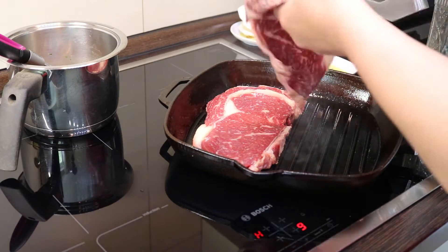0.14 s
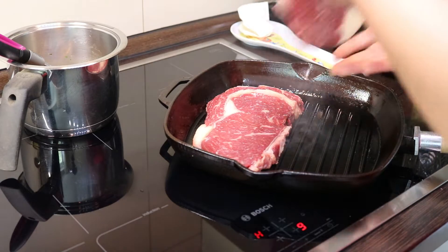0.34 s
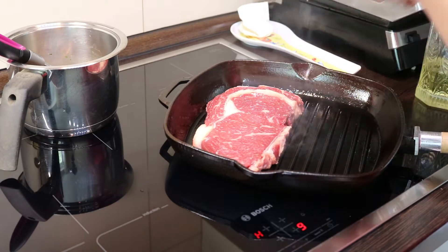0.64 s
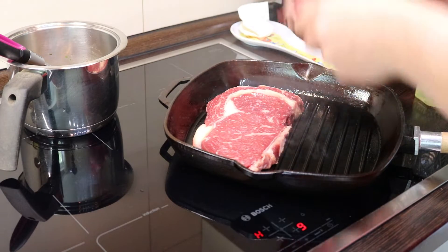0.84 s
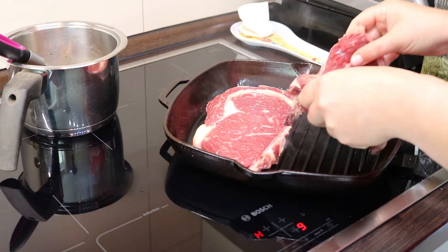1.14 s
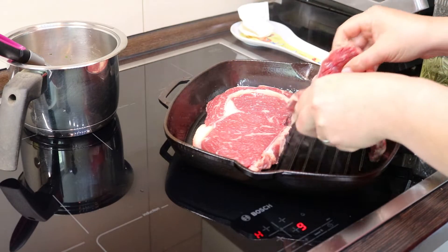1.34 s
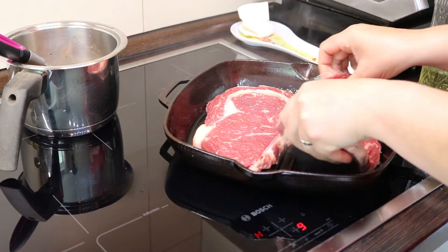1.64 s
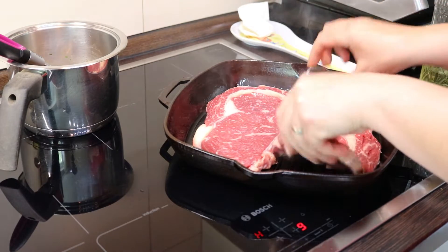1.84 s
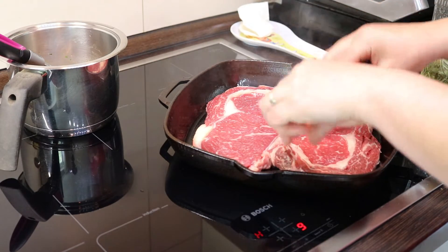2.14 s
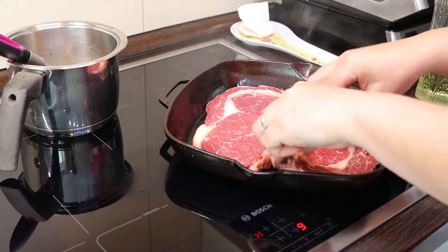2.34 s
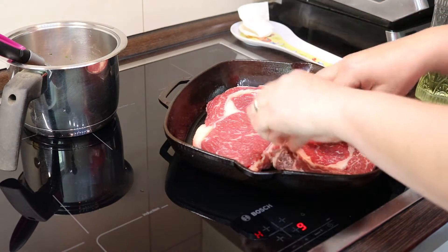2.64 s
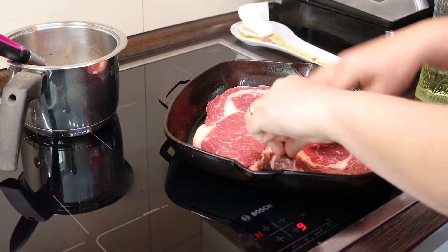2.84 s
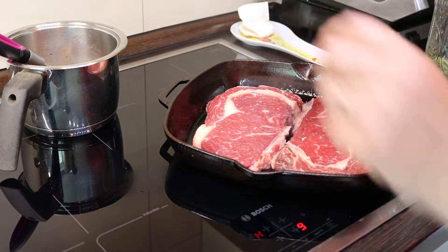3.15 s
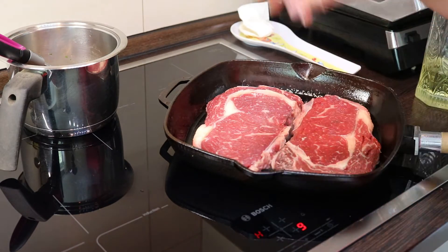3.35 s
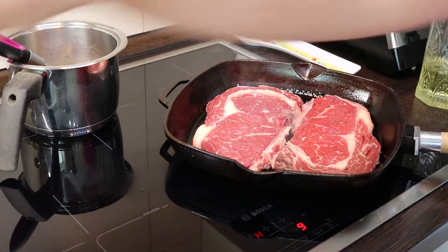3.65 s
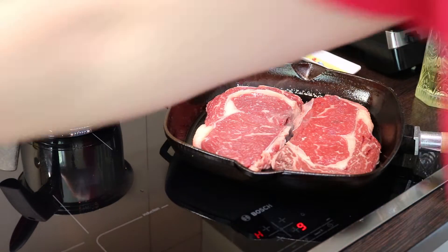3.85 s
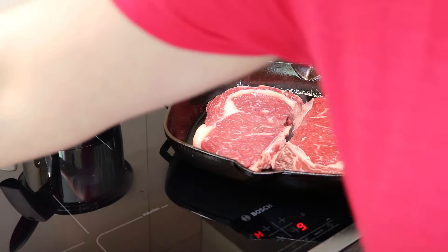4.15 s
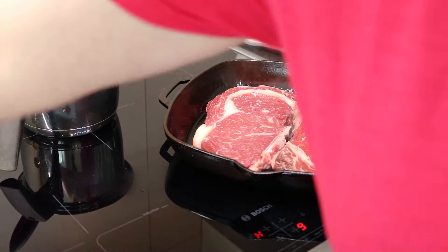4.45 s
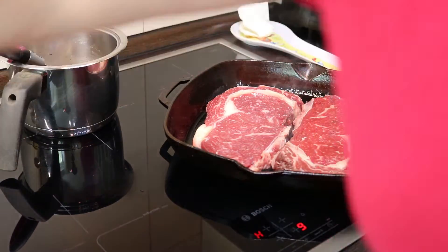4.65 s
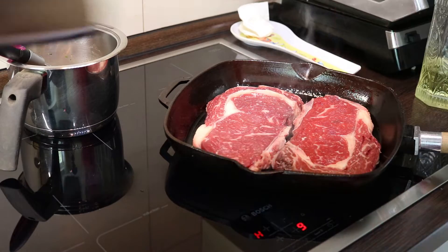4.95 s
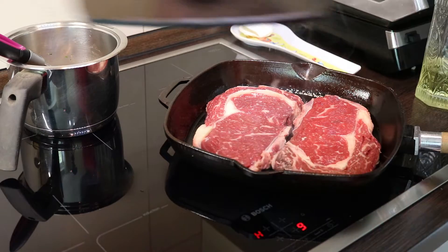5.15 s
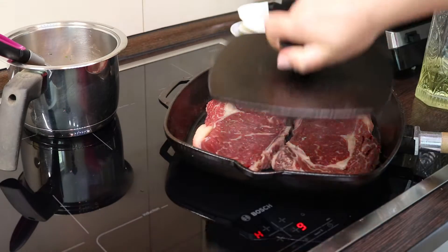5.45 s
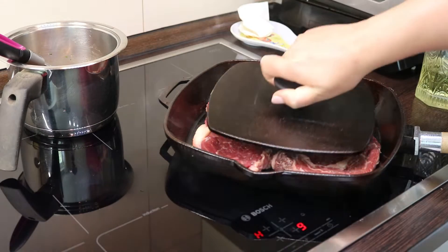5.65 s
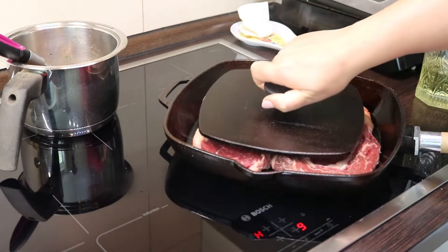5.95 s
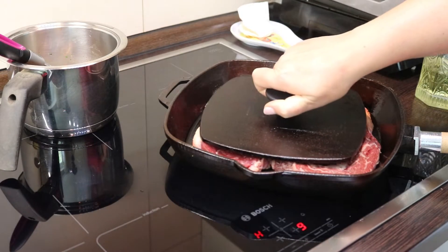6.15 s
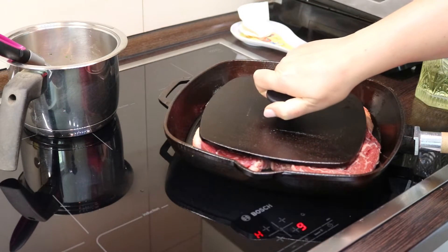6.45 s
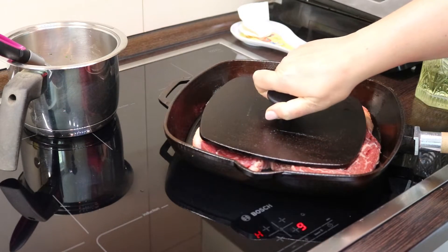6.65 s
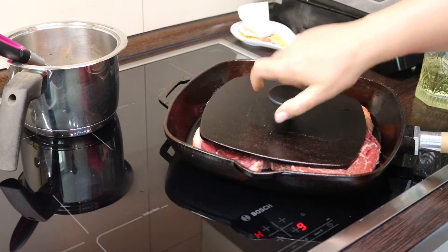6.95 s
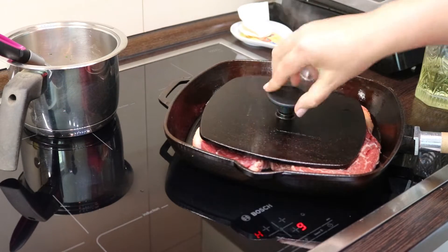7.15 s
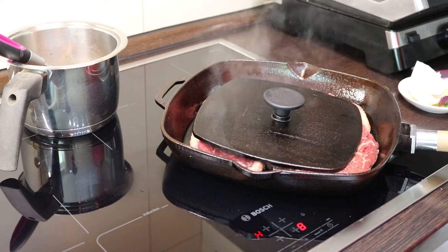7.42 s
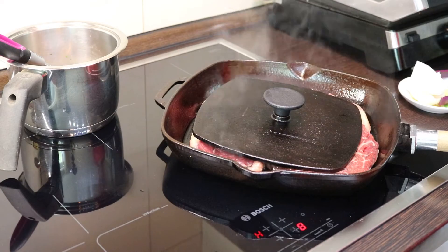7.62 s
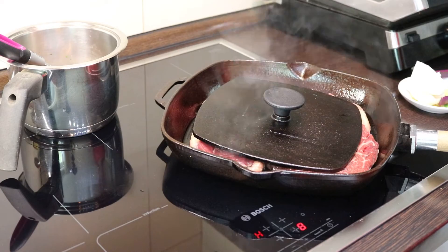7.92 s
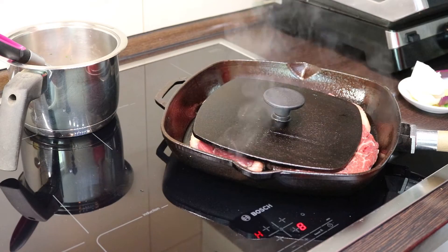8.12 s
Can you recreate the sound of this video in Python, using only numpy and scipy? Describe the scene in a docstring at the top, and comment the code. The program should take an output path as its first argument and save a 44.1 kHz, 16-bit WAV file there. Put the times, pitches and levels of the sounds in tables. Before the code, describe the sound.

Meat fries in a hot iron pan with a continuous crackling hiss, heard from close up in a home kitchen over a faint stove hum. Water drops burst in the fat, loudest in the first moments and once around the middle, and trapped juice spurts and fizzes. Late on, the sizzle turns slightly rougher and more bubbly, then stops dead. A short, quiet rumble and a very faint rising hiss follow.

```python
"""Steaks sizzle in a cast-iron grill pan on an induction hob in a small kitchen. Steam bubbles of three
sizes burst in the fat, flare up when juice meets the iron and grow coarser under a press.
Water drops pop, trapped juice spurts, steam jets fizz; behind them are soft bumps and the hob's hum.
The sound cuts off abruptly; a brief dull rumble follows in near silence, then a faint rising hiss."""
import sys
import numpy as np
from scipy import signal
from scipy.fft import rfft, irfft, next_fast_len
from scipy.io import wavfile
from scipy.ndimage import uniform_filter1d, map_coordinates

SR = 44100
rng = np.random.default_rng(int(sys.argv[2]) if len(sys.argv) > 2 else 0)


def transcribe(u):
    """Save the signal u as a 16-bit wav file named by the first command-line argument.

    u: samples, shape (n,) or (channels, n), limited to [-1, 1]; the rate is SR.
    q: integer samples, one column per channel.
    """
    v = np.clip(np.atleast_2d(u).T, -1, 1)
    q = np.round(v * 32767).astype(np.int16)
    wavfile.write(sys.argv[1], SR, q)


N = 365148
TIME = np.arange(N) / SR
TOP_HZ = 16000
CRACK_LEAD_S = .001  # build-up before a crack's peak


def amp(db):
    """Decibels to gain."""
    return 10 ** (np.asarray(db) / 20)


def unit(x):
    """Scale to rms 1."""
    return x / np.sqrt(np.mean(x ** 2) + 1e-20)


def along(points, hz):
    """Interpolate (freq_hz, value) points on a log axis."""
    freqs_hz, values = np.transpose(points)
    return np.interp(np.log(hz + 1), np.log(freqs_hz + 1), values)


def curve(points):
    """Interpolate (time_s, value) points per sample."""
    return np.interp(TIME, *np.transpose(points))


def envelope(start_s, length_s, attack_s, release_s):
    """Linear rise, hold until length_s is over, exponential fall."""
    t = TIME - start_s
    return np.clip(t / attack_s, 0, 1) * np.exp(-np.maximum(t - length_s, 0) / release_s)


def wobble(rate_hz):
    """Smooth random curve, rate_hz knots a second."""
    return map_coordinates(rng.standard_normal(int(rate_hz * N / SR) + 4), [rate_hz * TIME])


def filtered(x, gain):
    """Apply gain(freq_hz) to x."""
    size = x.shape[-1]
    padded = next_fast_len(size + 8192)
    return irfft(rfft(x, padded) * gain(np.fft.rfftfreq(padded, 1 / SR)), padded)[..., :size]


def resonance(f, hz, q):
    """Causal two-pole band-pass response."""
    return 1j * f * hz / q / (hz * hz - f * f + 1j * f * hz / q)


def add(track, start_s, sound):
    """Mix a sound into a track."""
    part = track[..., max(round(start_s * SR), 0):][..., :sound.shape[-1]]
    part += sound[..., :part.shape[-1]]


def stereo_noise(spectrum, side_db):
    """Coloured noise, rms 1."""
    mid, side = filtered(rng.standard_normal((2, N)), lambda f: amp(along(spectrum, f)))
    return unit(np.array([mid + amp(side_db) * side, mid - amp(side_db) * side]))


# freq_hz, relative_db
RUMBLE_SPECTRUM = [(20, -10), (45, -5.5), (90, -8.5), (160, -25), (400, -30), (1000, -29), (2700, -36),
                   (3500, -43.5), (15000, -51.5)]
def room_noise(level_db=-68.5):
    """Steady low noise of the kitchen."""
    return amp(level_db) * stereo_noise(RUMBLE_SPECTRUM, side_db=3.5)


def rumble(level_db=-49.5, floor_db=-111, sputter_db=2.5):
    """One brief, dull, sputtering rumble over a near-silent floor."""
    swell = envelope(start_s=7.48, length_s=.21, attack_s=.0051, release_s=.0039)
    sputter = unit(amp(sputter_db * wobble(rate_hz=45)))
    return (amp(floor_db) + amp(level_db) * swell * sputter) * stereo_noise(RUMBLE_SPECTRUM, side_db=-3)


# freq_hz, relative_db
HISS_SPECTRUM = [(30, -16.5), (330, -4.5), (1000, -6.5), (2500, -15), (6000, -6), (9000, -27), (16000, -34)]
def hiss(floor_db=-101, end_db=-62, rise_db_per_s=550):
    """Faint hiss that swells at the very end."""
    swell = amp(end_db - rise_db_per_s * (TIME[-1] - TIME))
    return (amp(floor_db) + swell) * stereo_noise(HISS_SPECTRUM, side_db=-9)


# time_s, level_db
COIL_LEVELS = [(0, -56), (1.4, -57), (2.2, -56.5), (2.7, -60.5), (3.8, -63.5), (4.4, -57.5), (5.4, -60.5),
               (6.6, -58), (6.68, -69), (7.3, -64)]
def hob_hum(pitch_hz=100, waver_db=2.5):
    """The induction coil hums at twice the mains frequency, wavering a little."""
    level_db = curve(COIL_LEVELS) + waver_db * wobble(rate_hz=12)
    phase = 2 * np.pi * pitch_hz * TIME
    tone = np.sin(phase) + amp(-22) * np.sin(2 * phase) + amp(-10.5) * np.sin(3 * phase)
    return amp(level_db) * unit(tone)


# freq_hz, t60_s
KITCHEN_DECAY = [(200, 0.43), (2000, 0.33), (8000, 0.19), (16000, 0.24)]
def kitchen_response(near_db, room_db, near_t60_s=.04, alike_hz=1500):
    """Stereo path from one spot: direct sound, near echoes off rim, hob and wall, then the room."""
    t = np.arange(SR // 5) / SR
    near = rng.standard_normal((2, len(t))) * (rng.random(len(t)) < .3) * amp(-60 * t / near_t60_s)
    hz, frame_s, spectra = signal.stft(rng.standard_normal((2, len(t))), SR, nperseg=256)
    decay = amp(-60 * frame_s / along(KITCHEN_DECAY, hz)[:, None])
    room = signal.istft(spectra * decay, SR, nperseg=256)[1][:, :len(t)]
    near = amp(near_db) * near / np.linalg.norm(near[0])
    room = amp(room_db) * room / np.linalg.norm(room[0])
    mid, side = near + room
    # long waves reach both sides more alike
    side_share = lambda f: .2 + .34 * f ** 2 / (f ** 2 + alike_hz ** 2)
    mid = filtered(mid, lambda f: np.sqrt(1 - side_share(f)))
    side = filtered(side, lambda f: np.sqrt(side_share(f)))
    response = np.array([mid + side, mid - side])
    response[0, rng.integers(0, 3)] += 1  # direct sound, up to 2 samples later on the left
    response[1, 0] += 1
    return response


def puffs(rows, q, gain_db, echo_db):
    """Short bursts of irregular pulses, each ringing broadly about its pitch."""
    out, t = np.zeros((2, N)), np.arange(SR // 2) / SR
    for start_s, level_db, pitch_hz, length_s in rows:
        pulses = rng.standard_normal(len(t)) * amp(4 * rng.standard_normal(len(t)))
        swell = (1 - np.exp(-t / .002)) * np.exp(-1.5 * t / length_s)
        puff = filtered(pulses, lambda f: resonance(f, pitch_hz, q) ** 2) * swell
        heard = signal.fftconvolve(puff[None], kitchen_response(echo_db, echo_db), axes=1)
        heard *= np.linalg.norm(swell) * np.sqrt(2) / np.linalg.norm(heard)
        add(out, start_s, amp(level_db + gain_db) * heard)
    return out


# start_s, relative_db, pitch_hz, length_s
HANDLING_BUMPS = [(1.008, -41, 340, .05), (1.082, -41, 640, .035), (3.358, -47, 270, .05),
                  (3.413, -51, 190, .05), (3.86, -55, 200, .06), (5.47, -52, 220, .05),
                  (5.585, -54, 190, .06)]
def bumps():
    """Soft bumps of handling at the stove."""
    return puffs(HANDLING_BUMPS, q=.99, gain_db=5, echo_db=-12)


# start_s, relative_db, pitch_hz, length_s
STEAM_SPURTS = [(.107, -28, 1250, .01), (1.338, -32, 900, .03), (1.859, -32, 1100, .012),
                (2.05, -36, 1360, .06), (2.661, -34.5, 1000, .014), (2.99, -31, 2100, .025),
                (3.194, -36, 800, .01), (4.535, -30, 1120, .025), (4.745, -33, 1200, .025),
                (4.887, -26.5, 1200, .024), (5.87, -28.5, 1200, .02), (6.049, -25, 1400, .022),
                (6.157, -27.5, 1100, .012), (6.193, -31.5, 1250, .015), (6.461, -28, 1300, .014),
                (6.547, -23, 1250, .018), (6.59, -29.5, 1200, .025)]
def spurts():
    """Steam spurts from under the meat."""
    return puffs(STEAM_SPURTS, q=.7, gain_db=4, echo_db=-4)


# start_s, relative_db, pitch_hz, length_s
STEAM_JETS = [(.135, -27.5, 5900, 0.13), (.205, -26, 5900, 0.047), (.365, -22, 6100, 0.13),
              (.5, -30.5, 12000, .08), (.85, -29, 8500, .025), (.87, -26, 7000, .06),
              (1.87, -28, 3900, 0.18), (2.15, -30, 13980, .08), (2.48, -30.5, 13500, .17),
              (2.88, -26.5, 9300, 0.15), (2.935, -26.5, 8600, 0.093), (3.45, -27, 7300, .07),
              (3.6, -29.5, 6960, 0.18), (6.66, -28.5, 5530, 0.24), (7.04, -32, 5460, .1),
              (7.145, -29, 5670, .06)]
def fizzes():
    """Thin jets of steam fizz, often after a pop."""
    return puffs(STEAM_JETS, q=2.2, gain_db=3.3, echo_db=-2)


def press():
    """How hard the press bears on the meat, 0-1."""
    return envelope(start_s=5.75, length_s=.9, attack_s=.068, release_s=.45)


# time_s, level_db
BASE_BOIL = [(0.0, -24.5), (0.75, -27), (1.5, -28), (2.15, -23.5), (2.75, -26), (3.4, -27.5), (4.1, -27),
             (5.1, -24.5), (5.65, -27.5), (5.9, -25.5), (6.6, -24), (7.32, -26)]
# start_s, length_s, lift_db, fineness_db
JUICE_FLARES = [(.1, 0.12, 0.57, 3), (.33, 0.071, 2.6, 5.5), (.42, 0.095, 1.5, 0.5), (.55, 0.053, 2.8, 2),
                (.79, 0.16, 1.8, 1), (1.02, 0.16, 3.9, 1.5), (1.23, .13, 4.3, .2), (1.49, 0.091, 4, -0.5),
                (1.65, 0.12, 2.2, 1.5), (1.79, 0.26, 3, -0.5), (2.4, 0.069, 1.4, 0), (2.56, 0.084, 1.9, 1),
                (2.845, 0.14, 3.0, 1.5), (3.14, 0.13, 2.1, 1), (3.32, 0.21, 3.4, 0), (3.55, 0.18, 1.2, -1),
                (4.39, 0.19, 2.6, -0.5), (4.69, 0.19, 3.5, -0.5), (5.25, 0.046, 2.3, 0.5),
                (5.42, 0.1, 2.9, 0.5), (6.0, 0.11, 2.6, 1.2), (6.4, 0.22, 2.6, 0.5),
                (6.97, 0.18, 1.2, -1.4)]
def boil_levels(press_large_db=4.5):
    """Large, medium and fine bubble levels: juice flares on hot iron; pressed-out juice boils coarser."""
    boil_db, tilt_db = curve(BASE_BOIL), np.zeros(N)
    for start_s, length_s, lift_db, fineness_db in JUICE_FLARES:
        flare = envelope(start_s, length_s, attack_s=.065, release_s=.043)
        boil_db += lift_db * flare
        tilt_db += fineness_db * flare
    large_db = boil_db - 9 - tilt_db + press_large_db * press()
    medium_db = boil_db - 1.18
    fine_db = boil_db - 3 + tilt_db
    return large_db, medium_db, fine_db


def drop_burst(hz, q, spatter_t60_s, wall_s=.0045, wall_smear_s=.0015, wall_db=-10):
    """A drop flashes to steam: crack and spatter, coloured by the cavity; energy of 5 ms at rms 1."""
    t = np.arange(SR // 20) / SR
    spatter = rng.standard_normal(len(t)) * amp(-60 * t / spatter_t60_s)
    blow = np.pad((t == 0) + spatter / np.linalg.norm(spatter), (round(CRACK_LEAD_S * SR), 0))
    cavity = lambda f: resonance(f, hz, q) * resonance(f, hz, .35)
    crack = filtered(blow, lambda f: cavity(f) * np.clip((TOP_HZ - f) / 1000, 0, 1))
    low_cut = signal.butter(4, hz * np.exp(-.7 / q), "highpass", fs=SR, output="sos")
    crack = signal.sosfilt(low_cut, crack)
    scatter = rng.standard_normal(round(wall_smear_s * SR))
    wall_echo = np.convolve(crack, scatter / np.linalg.norm(scatter))
    add(crack, wall_s, amp(wall_db) * wall_echo)
    heard = signal.fftconvolve(crack[None], kitchen_response(near_db=-7, room_db=-12), axes=1)
    return heard * np.sqrt(.005 * SR / np.mean(np.sum(heard ** 2, axis=1)))


def crackles(pitches=20, drops_per_pitch=10, offset_db=-2.5, spread_db=2.5):
    """Lesser drops burst at random, as hard as the fat boils."""
    out = np.zeros((2, N))
    _, medium_db, _ = boil_levels()
    for pitch_hz in np.geomspace(2600, 13000, pitches):
        crack = drop_burst(pitch_hz, q=2.5, spatter_t60_s=.02)
        onsets = rng.integers(0, N, drops_per_pitch)
        sizes_db = offset_db + spread_db * rng.uniform(-1.8, 1, drops_per_pitch)
        for onset, size_db in zip(onsets, sizes_db):
            add(out, onset / SR, amp(medium_db[onset] + size_db) * crack)
    return out


# peak_s, level_db, pitch_hz, q, spatter_t60_s
DROP_POPS = [(.1083, -18, 6500, 1.2, .012), (.1286, -7.5, 6600, 1.6, .01), (.3572, -1, 6700, 2.3, .011),
             (.4956, -10.5, 11500, 2, .006), (.4958, -19, 4500, .6, .004), (.6127, -15, 6200, .6, .005),
             (.6851, -26, 3600, 2, .03), (.8673, -11.5, 6600, 2, .004), (1.158, -21, 10300, 2.5, .015),
             (1.7118, -21, 6500, .6, .02), (1.785, -21, 7000, .8, .002), (2.1889, -19, 13500, 2, .015),
             (2.409, -21, 6500, 1, .002), (2.441, -23.5, 5500, 1, .008), (2.54, -21.5, 9000, .7, .002),
             (2.6461, -19.5, 9000, .9, .008), (2.6641, -19.5, 5200, 1.6, .016), (2.8197, -20, 5400, 3, .03),
             (2.8987, -19, 8500, .9, .008), (2.9328, -19, 9300, 1, .006), (3.1555, -22, 5500, 1.5, .02),
             (3.1953, -23, 3100, 3, .04), (3.4594, -18.5, 7200, 2.5, .025), (3.5625, -10.5, 6000, 1.6, .01),
             (3.5628, -13.5, 2800, .7, .012), (3.6228, -21, 6000, .5, .015), (3.6608, -23, 6000, 2, .02),
             (3.744, -19, 7500, 1, .015), (3.7922, -23, 5800, 1.8, .02), (3.9357, -20, 5500, 1.2, .009),
             (4.0319, -24, 5500, 1.2, .012), (4.4595, -22, 3900, 2, .03), (4.537, -22, 4800, 1, .012),
             (4.7625, -21, 9000, .8, .01), (4.8857, -19.5, 5000, .5, .008), (4.9824, -20, 6300, 1.5, .002),
             (4.9973, -22, 4400, 1, .008), (5.1206, -16.5, 4900, .55, .005),
             (5.145, -22.5, 4500, 1.5, .006), (5.2271, -20, 2800, 2.2, .025), (5.308, -20, 6800, 1.5, .015),
             (5.3153, -17.5, 5800, .7, .025), (5.4855, -21.5, 5500, .6, .02), (5.839, -21.5, 6600, 2, .002),
             (5.8727, -21.5, 3400, 1, .015), (6.1128, -20, 7000, .7, .025), (6.1588, -18, 2100, 1.2, .015),
             (6.4141, -21.5, 5200, 1.6, .025), (6.6076, -18.5, 5800, 1.4, .006),
             (6.657, -16.5, 4800, 1.1, .018), (6.9205, -21.5, 9500, 2, .005),
             (7.013, -22.5, 5300, 1.6, .03), (7.087, -22, 4200, 1.2, .015), (7.1447, -19, 5400, 1.6, .009),
             (7.331, -21.5, 5300, 1.6, .012)]
# start_s, peak_db
STEAM_PUSHES = [(.1286, -17), (.3572, -34), (.8673, -29), (3.5625, -4.5)]
def pops(push_decay_s=.0003):
    """Water drops explode in the fat; the biggest add a low push of steam."""
    out = np.zeros((2, N))
    for peak_s, level_db, pitch_hz, q, spatter_t60_s in DROP_POPS:
        add(out, peak_s - CRACK_LEAD_S, amp(level_db) * drop_burst(pitch_hz, q, spatter_t60_s))
    age = np.arange(SR // 100) / SR / push_decay_s
    push = (1 - .5 * age) * np.exp(-age)
    for start_s, peak_db in STEAM_PUSHES:
        add(out, start_s, amp(peak_db) * push)
    return out


def bubbles(rate_hz, spread_db, clump_db, echo_db, clump_hz=90, handovers=16, active_spots=5):
    """Tiny unequal bursts in clumps; a few spots boil at a time, each drying as a new one starts."""
    step = N // handovers
    life = active_spots * step
    out = np.zeros((2, life + N))
    for spot in range(1, handovers + active_spots):
        response = kitchen_response(echo_db, echo_db)
        knots = rng.standard_normal(int(clump_hz * life / SR) + 2)
        onsets = rng.integers(0, life, int(rate_hz * step / SR))
        clump = np.interp(clump_hz * onsets / SR, np.arange(len(knots)), knots)
        size_db = spread_db * np.minimum(rng.standard_normal(len(onsets)), 2.4)
        size_db += clump_db * np.minimum(clump, 1.8)
        bursts = np.bincount(onsets, amp(size_db) * rng.choice([-1, 1], len(onsets)), life)
        add(out, spot * step / SR, signal.fftconvolve(bursts[None], response, axes=1))
    return out[:, life:]


def patchy(x, depth_db, patch_bins=6, patch_frames=12):
    """Neighbouring bubbles are alike in size, so the sound brightens in brief patches of pitch."""
    spectra = signal.stft(x, nperseg=256)[2]
    field = uniform_filter1d(rng.standard_normal(spectra.shape[1:]), patch_bins, axis=0)
    field = uniform_filter1d(field, patch_frames, axis=1)
    return signal.istft(spectra * unit(amp(depth_db * unit(field))), nperseg=256)[1][:, :N]


# freq_hz, relative_db
SIZZLE_SPECTRUM = [(76, -50), (130, -22), (472, -17), (690, -14.5), (860, -11.5), (1120, -7), (1450, -6.5),
                   (2270, 0), (4070, -0.5), (6730, 1.5), (10000, -2), (13900, -6.5), (16000, -14)]
# centre_hz, width_hz, lift_db
PAN_RESONANCES = [(295, 170, -5.5), (533, 58, 6), (608, 16, 5), (650, 18, 3.5), (760, 85, 4.5),
                  (925, 70, 2.5), (1125, 50, 3.5), (1518, 32, 4), (1740, 30, 3.5), (3120, 290, 2),
                  (5330, 600, 1.5), (6950, 160, 2)]
def sizzle_band(x, low_hz, high_hz):
    """One band of the sizzle, coloured by the pan and the corner it stands in; rms 1."""
    def gain(f):
        pan_db = sum(db / (1 + (2 * (f - hz) / width_hz) ** 2) for hz, width_hz, db in PAN_RESONANCES)
        above = lambda hz: 1 / (1 + (hz / (f + 1)) ** 8)
        return amp(along(SIZZLE_SPECTRUM, f) + pan_db) * np.sqrt(above(low_hz) * (1 - above(high_hz)))
    return unit(filtered(x, gain))


def sizzle(simmer_db=-60.5):
    """Large bubbles burst low and sparse, fine spray high and dense; single spits tick over both."""
    large_db, medium_db, fine_db = boil_levels()
    large = bubbles(rate_hz=2400, spread_db=5.5, clump_db=3.5, echo_db=2)
    medium = bubbles(rate_hz=7000, spread_db=5.5, clump_db=3, echo_db=4)
    fine = bubbles(rate_hz=7200, spread_db=6, clump_db=2, echo_db=1.5)
    spits = bubbles(rate_hz=90, spread_db=4.5, clump_db=1, echo_db=-4, handovers=3)
    simmer = amp(simmer_db) * sizzle_band(large, 98, 380)
    boil = (amp(large_db) * sizzle_band(large, 420, 2790)
            + amp(medium_db) * sizzle_band(medium, 3060, 8700)
            + amp(fine_db) * sizzle_band(fine, 8000, 19000)
            + amp(medium_db - 11) * sizzle_band(spits, 700, 14000))
    return simmer + patchy(boil, depth_db=1.2)


def scene(cut_s=7.336, cut_decay_s=.0026, lean_db=1, press_lean_db=.5):
    """The pan stands a little to the right; the sound of frying and kitchen stops abruptly at cut_s."""
    frying = spurts() + fizzes() + sizzle() + crackles() + pops()
    balance = lambda right_db: amp(np.array([-right_db, right_db]) / 2)
    # freq_hz, right_minus_left_db
    stereo_colour = [(1000, -1.5), (2400, 1.6), (4000, 0), (6500, .5), (10000, -1)]
    frying = filtered(frying, lambda f: balance(along(stereo_colour, f)))
    frying *= balance(lean_db + press_lean_db * press())
    kitchen = bumps() + hob_hum() + room_noise()
    cut = np.exp(-np.maximum(TIME - cut_s, 0) / cut_decay_s)
    return (frying + kitchen) * cut + rumble() + hiss()


def record(dry, threshold_rms=.55, attack_s=.007, recovery_db_per_s=85, ceiling=.9):
    """A limiter ducks after the loudest pops, whose first cycles clip; then a low-pass at TOP_HZ."""
    power = np.abs(uniform_filter1d(np.mean(dry ** 2, axis=0), SR // 1000))
    over_db = np.maximum(10 * np.log10(power / threshold_rms ** 2 + 1e-12), 0)
    duck_db = np.maximum.accumulate(over_db + recovery_db_per_s * TIME) - recovery_db_per_s * TIME
    pole = np.exp(-1 / (attack_s * SR))
    duck_db = signal.lfilter([1 - pole], [1, -pole], duck_db)
    limited = np.clip(dry * amp(-duck_db), -ceiling, ceiling)
    return filtered(limited, lambda f: np.clip((TOP_HZ - f) / 400 + .5, 0, 1))


dry = scene()
out = record(dry)
transcribe(out)
```